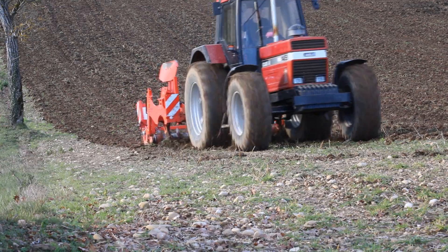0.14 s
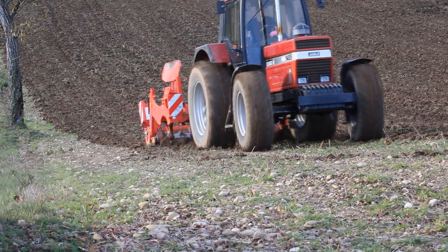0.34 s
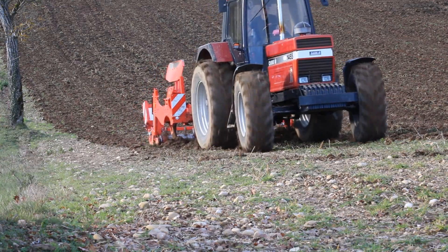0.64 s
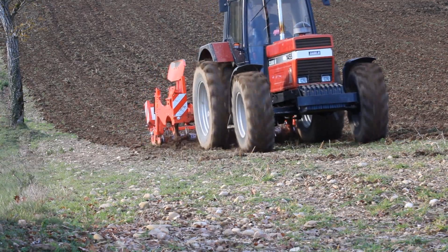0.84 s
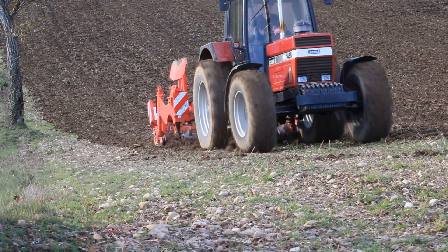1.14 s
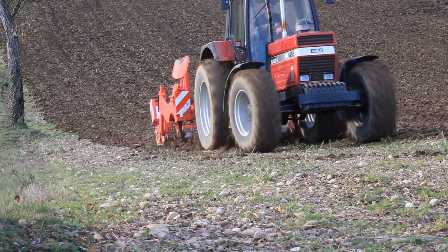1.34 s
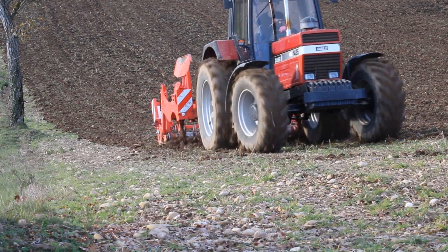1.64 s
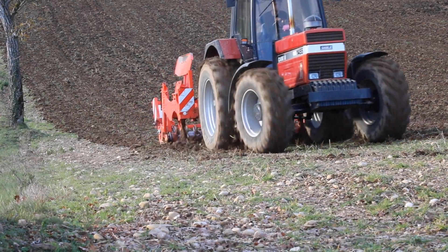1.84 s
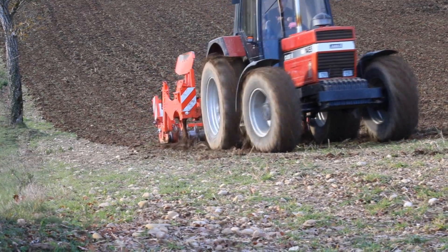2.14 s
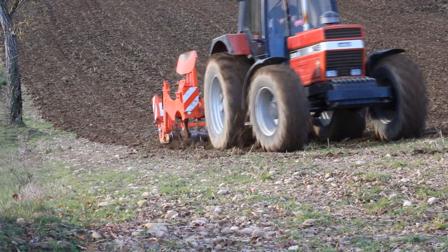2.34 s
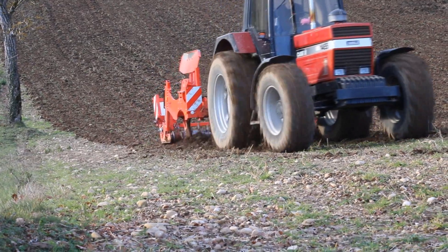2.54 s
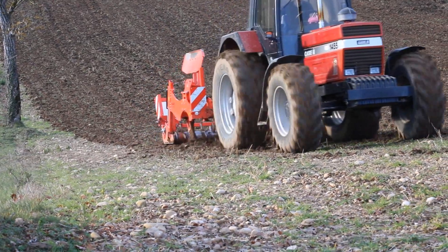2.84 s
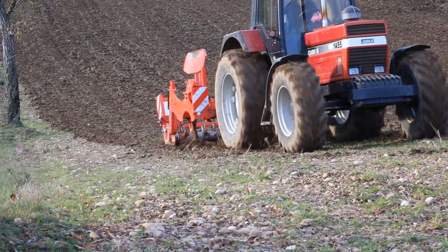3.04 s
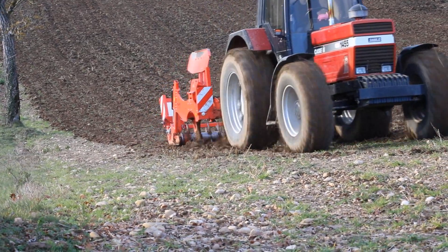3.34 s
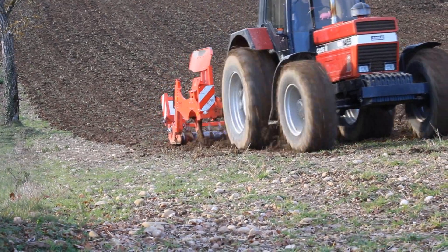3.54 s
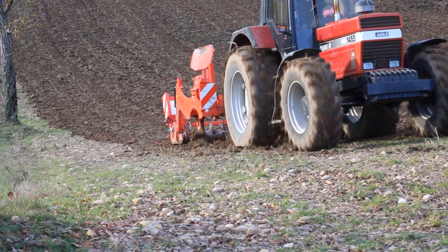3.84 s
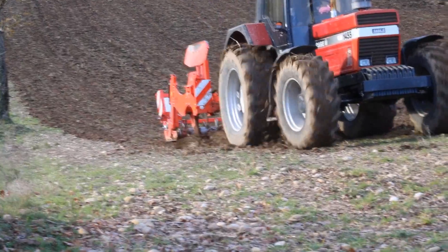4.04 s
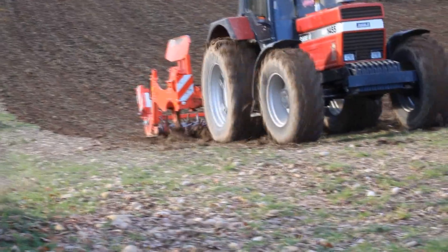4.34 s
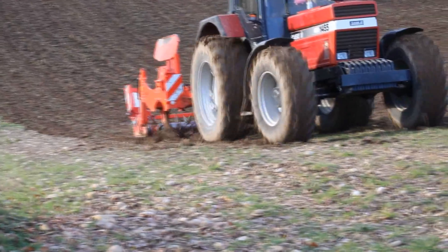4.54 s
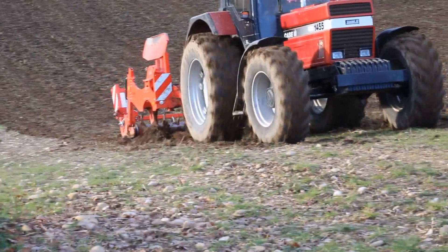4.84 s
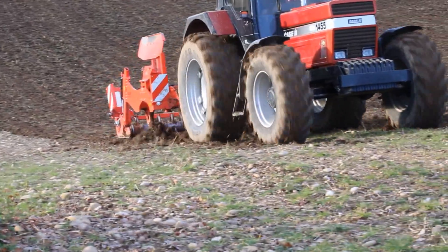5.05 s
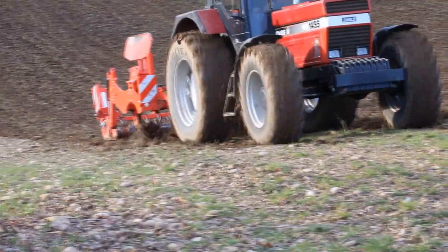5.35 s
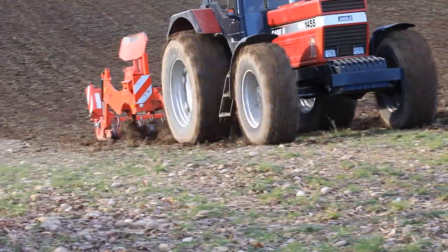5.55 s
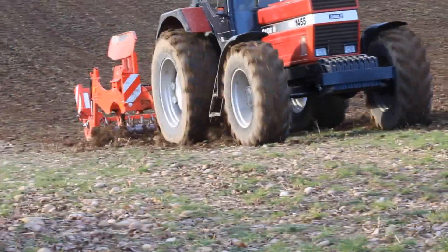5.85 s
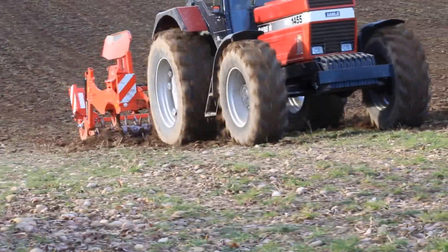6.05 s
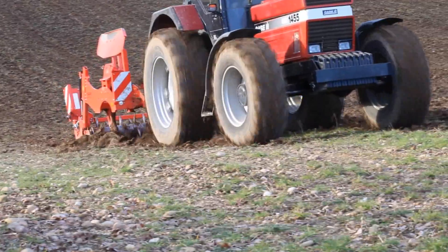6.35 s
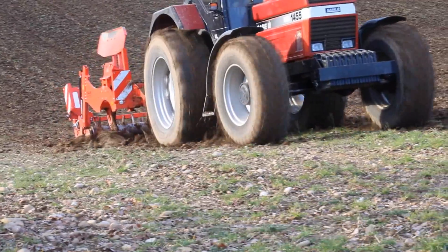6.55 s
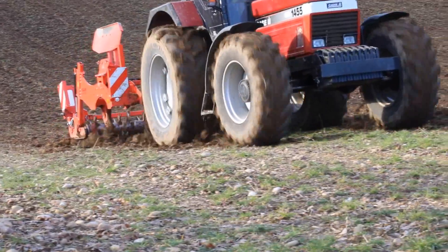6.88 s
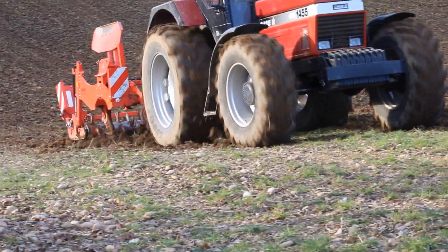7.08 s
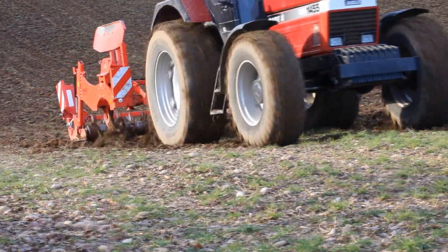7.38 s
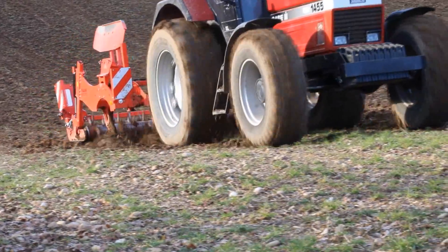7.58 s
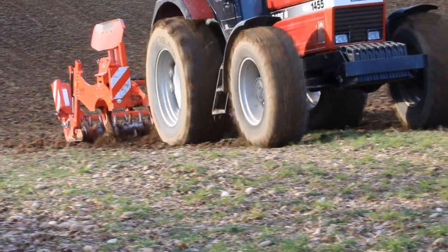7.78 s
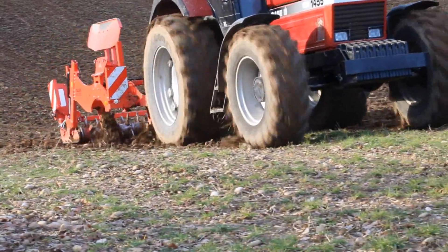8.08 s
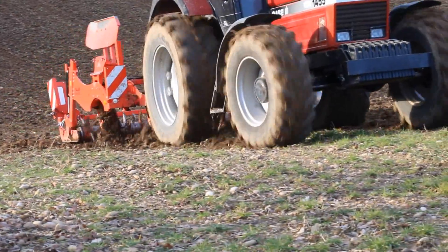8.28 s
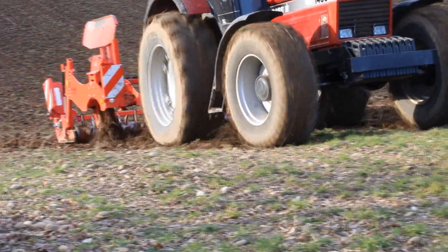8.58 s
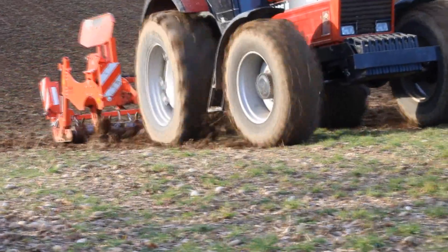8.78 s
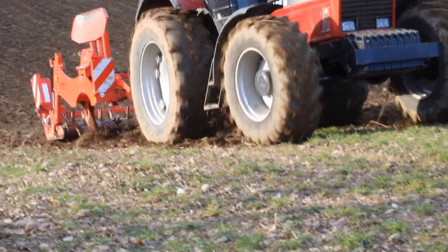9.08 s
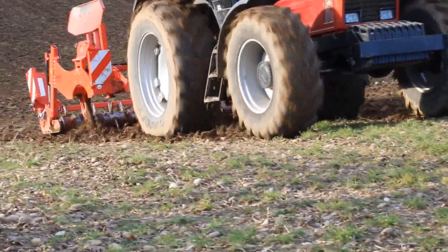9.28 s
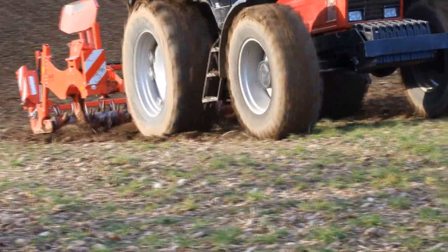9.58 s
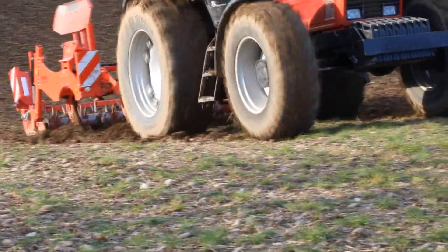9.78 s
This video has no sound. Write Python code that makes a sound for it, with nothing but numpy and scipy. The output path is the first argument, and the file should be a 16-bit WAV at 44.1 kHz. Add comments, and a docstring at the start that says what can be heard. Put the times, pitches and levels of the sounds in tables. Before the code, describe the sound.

A tractor's diesel engine labours steadily across a field with a deep, raspy exhaust drone, nearing amid gusts of wind.

```python
"""Tractor pulling a subsoiler

A six-cylinder diesel labours across a field, coming closer. Each firing booms from the open exhaust
stack, rings it and tears out a rasp of gas. The ground returns a copy whose delay grows, so a comb
sweeps slowly downwards. Wind buffets the microphone and the recorder clips the peaks."""
import sys
import numpy as np
from scipy import signal
from scipy.fft import rfft, irfft
from scipy.io import wavfile
from scipy.ndimage import map_coordinates

SR = 44100
rng = np.random.default_rng(int(sys.argv[2]) if len(sys.argv) > 2 else 0)


def persist_wave(psi):
    """Save psi, clipped to +-1, as 16-bit WAV."""
    counts = np.round(np.clip(psi, -1, 1) * 32767).astype(np.int16)
    wavfile.write(sys.argv[1], SR, np.atleast_2d(counts).T)


N = 437472
TIME = np.arange(N) / SR
NEARER = np.linspace(-.5, .5, N)  # times a rise_db: the gain over the whole approach


def undb(db):
    """Decibels to gain."""
    return 10 ** (np.asarray(db) / 20)


def unit(x):
    """Scale to an rms of 1."""
    return x / np.sqrt(np.mean(x ** 2))


def curves(table):
    """Each column of a table, joined by straight lines in time."""
    times_s, *columns = np.transpose(table)
    return [np.interp(TIME, times_s, column) for column in columns]


def colour(x, points):
    """Filter by a spectrum of (Hz, dB) points."""
    hz, db = np.transpose(points)
    bins_hz = np.maximum(np.fft.rfftfreq(N, 1 / SR), 1)
    return irfft(rfft(x) * undb(np.interp(np.log(bins_hz), np.log(hz), db)), N)


def below(x, hz):
    """Zero-phase low-pass."""
    return signal.sosfiltfilt(signal.butter(2, hz, fs=SR, output="sos"), x)


def band(x, hz, width_hz):
    """Resonant band-pass."""
    return signal.lfilter(*signal.iirpeak(hz, hz / width_hz, fs=SR), x)


def bump(centre_s, length_s):
    """A bell-shaped swell of height 1."""
    return np.exp(-2 * np.minimum(((TIME - centre_s) / length_s) ** 2, 20))


def walk(per_s=11):
    """A smooth random wander with an rms of 1."""
    knots = rng.standard_normal(2048)
    return unit(map_coordinates(knots, [TIME * per_s], order=3, mode="wrap"))


# Overtones of the boom. Each row: multiple of the crank speed, relative level in dB.
CRANK_ORDERS = [(4, -25), (7, -20), (8, -17), (9, -13.5), (10, -20.5), (11, -20.5), (12, -19), (13, -12),
                (14, -10.5), (16, -12.5), (17, -13), (19, -12), (20, -20), (21, -22), (24, -27),
                (25, -18.5), (26, -20.5), (27, -22.5), (28, -20.5), (29, -22), (32, -25), (43, -28),
                (46, -29)]
# Hum at twice the firing rate. Each row: time in seconds, relative level in dB.
HUM_LEVEL = [(0, -18.5), (.4, -20), (1.4, -19.5), (1.9, -21), (2.8, -19), (3.5, -20), (4.8, -20),
             (5.25, -17.5), (5.6, -19), (7.2, -20.5), (8.4, -19), (9.1, -20.5), (9.6, -23), (9.92, -22.5)]


def boom(firings, firing_hz, cruise_hz=95, db_per_hz=0.32, rise_db=1.5, overtone_db=-18.5):
    """Each firing's pressure pulse grows with engine speed; unequal cylinders add orders between."""
    pulse_db = -17 + db_per_hz * (firing_hz - cruise_hz) + rise_db * NEARER + 0.76 * walk()
    hum_db = curves(HUM_LEVEL)[0] + 0.62 * walk()
    phase = 2 * np.pi * firings
    pulse = undb(pulse_db) * np.cos(phase) + undb(hum_db) * np.cos(2 * phase)
    crank_phase = phase / 3  # three firings a turn
    overtones = sum(undb(db + 2 * walk()) * np.cos(order * crank_phase + 1.1 * rng.standard_normal())
                    for order, db in CRANK_ORDERS)
    return -np.sqrt(2) * (pulse + undb(overtone_db) * overtones)


# Blast strength. Each entry: one cylinder's relative level in dB, in firing order.
CYLINDER_DB = [2, -1.4, -.1, .6, 0, -1.4]


def blast(firings, lead, width, floor, scatter_db, repeat_share, jitter):
    """Gas noise swells once a firing; part recurs each cycle. Lead, width and jitter are in firings."""
    position = firings + lead + .5
    index = np.floor(position).astype(int)
    cylinders = len(CYLINDER_DB)
    strength, timing = rng.standard_normal((index[-1] + 1, 2))[index].T
    height = undb(np.array(CYLINDER_DB)[index % cylinders] + scatter_db * strength)
    from_peak = position % 1 - .5 - jitter * timing
    envelope = floor + height * np.exp(-.5 * (from_peak / width) ** 2)
    cycle_samples = int(cylinders * N / firings[-1])
    recurring = rng.standard_normal(N)[(firings / cylinders % 1 * cycle_samples).astype(int)]
    fresh = rng.standard_normal(N)
    return envelope * (np.sqrt(repeat_share) * recurring + np.sqrt(1 - repeat_share) * fresh)


# Stack resonances. Each row: frequency in Hz, width in Hz, relative level in dB.
STACK_MODES = [(235, 130, -3.5), (471, 275, 2), (539, 64, -4), (605, 91, -1.5), (838, 42, -7),
               (905, 175, 0), (1038, 126, -1.5), (1322, 183, -0.5), (1491, 70, 0), (1740, 460, -3.5),
               (1906, 470, -5), (2606, 510, -5)]


def stack_ring(samples=4096):
    """The stack's resonances side by side, as a minimum-phase impulse response."""
    bins_hz = np.fft.rfftfreq(samples, 1 / SR)
    power = sum(undb(2 * db) / (1 + 2 * ((bins_hz - hz) / width_hz) ** 2) ** 3
                for hz, width_hz, db in STACK_MODES)
    cepstrum = irfft(.5 * np.log(power + 1e-7))
    cepstrum[1:samples // 2] *= 2
    cepstrum[samples // 2 + 1:] = 0
    return irfft(np.exp(rfft(cepstrum)))


# Sharp cracks: hard firings and one loud knock, perhaps a stone on the tine.
# Each row: time in seconds, level in dB over the usual blast.
SHARP_CRACKS = [(.472, 12), (3.465, 9), (4.496, 7), (4.972, 7), (5.288, 7), (5.667, 8), (5.948, 9),
                (8.897, 13), (9.216, 4), (9.802, 7)]


def bark(firings, crack_s=0.0029, growl_from_s=4.6, growl_db=2.5):
    """Each blast rings the stack, a few cracks take the same colour; a growl swells at close range."""
    blasts = blast(firings, lead=.14, width=.13, floor=.77, scatter_db=3, repeat_share=.18, jitter=.068)
    cracks = sum(undb(db) * bump(s, crack_s) for s, db in SHARP_CRACKS) * rng.standard_normal(N)
    ringing = unit(signal.oaconvolve(unit(blasts) + cracks, stack_ring())[:N])
    growl_gain = undb(np.interp(TIME, [growl_from_s, TIME[-1]], [0, growl_db]))
    return ringing + (growl_gain - 1) * band(ringing, hz=540, width_hz=110)


# Gas jet spectrum. Each row: frequency in Hz, relative level in dB.
JET_SPECTRUM = [(1150, -7), (1400, 2), (2200, -0.5), (3000, 1.5), (3600, -1.5), (4600, -2), (5200, -4.5),
                (6000, -6.5), (7800, -11), (9400, -12.5), (11000, -22.5), (13000, -34), (15500, -54)]


def rasp(firings):
    """Gas tears out of the stack's mouth in a short puff just ahead of each trough of the boom."""
    puffs = blast(firings, lead=.047, width=.115, floor=.47, scatter_db=3.3, repeat_share=.05, jitter=.06)
    return unit(colour(puffs, JET_SPECTRUM))


def jet(firings, tear_db, hiss_db, split_hz=3300, air_hz=8300, far_db=-2, near_db=7.5):
    """Large eddies tear, small ones hiss; the air takes less of the top as the tractor nears."""
    tear = signal.sosfilt(signal.butter(3, split_hz, fs=SR, output="sos"), rasp(firings))
    hiss = signal.sosfilt(signal.butter(3, split_hz, "high", fs=SR, output="sos"), rasp(firings))
    gas = tear * undb(tear_db + 1.55 * walk()) + hiss * undb(hiss_db + 1.35 * walk())
    dull = below(gas, air_hz)
    return dull + (gas - dull) * undb(np.linspace(far_db, near_db, N))


# Exhaust treble. Each row: time in seconds, relative level in dB.
TREBLE_LEVEL = [(0.0, -30.5), (0.15, -25), (0.84, -29), (0.98, -18.5), (1.12, -29), (1.62, -22),
                (1.85, -23.5), (2.2, -23.5), (2.6, -23.5), (2.68, -28), (2.88, -23.5), (3.12, -27.5),
                (3.52, -24.5), (3.72, -28.5), (3.91, -23.5), (4.06, -31.5), (4.41, -24), (4.48, -28),
                (4.76, -26.5), (5.2, -30), (5.4, -29), (5.48, -31.5), (5.8, -31.5), (6.17, -24.5),
                (6.52, -31), (6.78, -25.5), (6.96, -28.5), (7.6, -27), (7.8, -28), (8.78, -28.5),
                (8.89, -24), (9.04, -28), (9.2, -34.5), (9.36, -28.5), (9.92, -27.5)]


def exhaust_gas(firings, dip_db, tear_rise_db=4.5, bark_rise_db=1):
    """Jet and bark together; the hiss comes and goes, and the lower layers follow it in part."""
    treble_db, = curves(TREBLE_LEVEL)
    swell_db = treble_db - treble_db.mean()
    tear_db = -21.5 + 0.34 * swell_db + tear_rise_db * NEARER + dip_db
    rush = jet(firings, tear_db, hiss_db=treble_db + 4.5)
    bark_db = -19 + 0.15 * swell_db + bark_rise_db * NEARER + dip_db + 0.55 * walk()
    return rush + bark(firings) * undb(bark_db)


# Stack nulls. Each row: frequency in Hz, width in Hz, starting depth from 0 to 1.
STACK_NULLS = [(1184, 110, 0.58), (5070, 200, 0.68)]


def stack_notches(x, fade_from_s=8.6, final_share=0.3):
    """The stack swallows two pitches, less deeply as the tractor turns its side."""
    share = np.interp(TIME, [fade_from_s, TIME[-1]], [1, final_share])
    for hz, width_hz, depth in STACK_NULLS:
        x = x - depth * share * band(x, hz, width_hz)
    return x


# Lag of the ground's copy. Each row: time in seconds, delay in seconds.
GROUND_DELAY = [(0, .00081), (1, .00084), (2, .00089), (3.3, .00097), (4.3, .00099), (5.4, .00107),
                (6.3, .00111), (7, .00116), (8.5, .00131), (9.92, .00147)]
# What the soil returns. Each row: time in seconds, share of the middle, share of the treble.
SOIL_RETURN = [(0, 0.38, .12), (1.5, 0.4, 0.14), (3.5, 0.51, 0), (5.5, 0.5, .06), (7, 0.48, 0),
               (8.2, 0.44, 0), (9.92, 0.47, .05)]


def ground_bounce(x, bass_share=0.62, bass_edge_hz=1100, treble_edge_hz=4400):
    """Add the bounce off the field, later as the tractor nears; the bass returns best."""
    delay_s, = curves(GROUND_DELAY)
    middle_share, treble_share = curves(SOIL_RETURN)
    late = map_coordinates(x, [(TIME - delay_s) * SR], order=3)
    bass, dull = below(late, bass_edge_hz), below(late, treble_edge_hz)
    return x + bass_share * bass + middle_share * (dull - bass) + treble_share * (late - dull)


# Engine speed. Each row: time in seconds, firing rate in Hz.
FIRING_RATE = [(0.0, 98.6), (1.0, 97.6), (1.9, 94.4), (2.4, 95.5), (3.2, 96.6), (3.8, 97.2), (4.1, 95.1),
               (4.6, 94.3), (5.6, 95.6), (6.1, 94.9), (6.8, 92.9), (7.1, 92.3), (7.4, 93.6), (8.0, 96.2),
               (8.4, 96.8), (8.8, 95.5), (9.4, 92.4), (9.92, 90.9)]
# Brief dips in loudness: an opening fade-in, then two short engine dips.
# Each row: centre in seconds, gain in dB, length in seconds.
LOUDNESS_DIPS = [(0.005, -3.5, 0.1), (3.05, -3, 0.08), (4.05, -2, 0.09)]


def tractor(first_firing_s=0.004):
    """Boom and exhaust gas share one firing clock and bounce off the ground together."""
    firing_hz, = curves(FIRING_RATE)
    firings = np.cumsum(firing_hz) / SR - firing_hz[0] * first_firing_s
    dip_db = sum(db * bump(s, length_s) for s, db, length_s in LOUDNESS_DIPS)
    gas = stack_notches(exhaust_gas(firings, dip_db))
    return ground_bounce(boom(firings, firing_hz) * undb(dip_db) + gas)


# Wind strength. Each row: time in seconds, relative level in dB.
WIND_LEVEL = [(0, -27), (.8, -25), (2.2, -32), (3, -18.5), (3.7, -41), (4.8, -25.5), (5.7, -17.5),
              (5.95, -25), (7.3, -25.5), (7.9, -17), (9.92, -26.5)]
# Hardest buffets. Each row: centre in seconds, relative level in dB, length in seconds.
WIND_BUFFETS = [(0.12, -14, 0.09), (0.628, -13, 0.034), (0.757, -12.5, 0.12), (5.603, -9, 0.022),
                (5.684, -11, 0.035), (5.75, -9, 0.018), (5.806, -11.5, 0.022), (6.085, 0, 0.0097),
                (6.24, -11, 0.03), (6.348, -12, 0.015), (6.492, -8.5, 0.023), (6.687, -12, 0.067),
                (6.887, -8, 0.016), (6.95, -9.5, 0.02), (7.126, -10.5, 0.053), (7.225, -7, 0.019),
                (7.566, -3, 0.011), (7.793, -16, 0.073), (7.919, -5, 0.018), (8.058, -12, 0.028)]
# Spectra of the rumble and of the thumps. Each row: frequency in Hz, relative level in dB.
RUMBLE_SPECTRUM = [(15, -30), (35, -31), (70, 2), (140, -0.5), (250, -3), (500, -16), (1500, -56)]
THUMP_SPECTRUM = [(20, -10), (60, -8), (130, 0), (250, 0), (400, -5.5), (750, -13.5), (2000, -32),
                  (6000, -62)]


def wind(rumble_db=-3.5, eddy_db=-4.5, buffet_db=-3.5, eddy_spread_db=3.5, ragged_db=2.5):
    """Wind rumbles on the microphone; small eddies thump at random and hard, ragged buffets strike."""
    wind_db, = curves(WIND_LEVEL)
    rumble = unit(colour(rng.standard_normal(N), RUMBLE_SPECTRUM)) * undb(wind_db + rumble_db)
    eddies = unit(undb(eddy_spread_db * walk(per_s=22))) * undb(wind_db + eddy_db)
    buffets = sum(undb(db + buffet_db) * bump(s, length_s) for s, db, length_s in WIND_BUFFETS)
    buffets *= unit(undb(ragged_db * walk(per_s=170)))
    thump_noise = unit(colour(rng.standard_normal(N), THUMP_SPECTRUM))
    return rumble + np.hypot(eddies, buffets) * thump_noise


def scene():
    """The tractor and the wind, in mono."""
    return (tractor() + wind())[None]


def record(dry):
    """The recorder clips at full scale and cuts the top."""
    top_hz = 15750
    return signal.sosfilt(signal.ellip(8, .2, 80, top_hz, fs=SR, output="sos"), np.clip(dry, -1, 1))


dry = scene()
out = record(dry)
persist_wave(out)
```